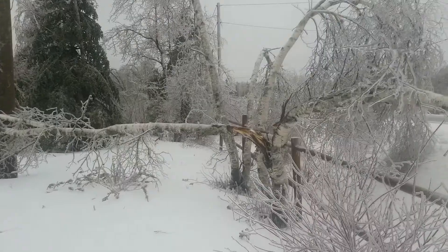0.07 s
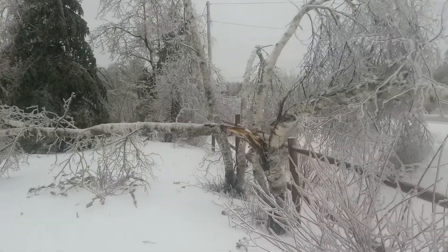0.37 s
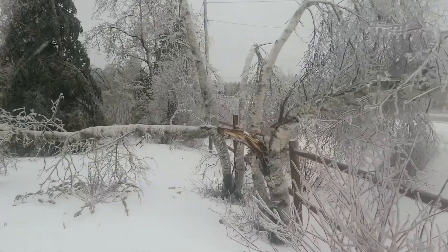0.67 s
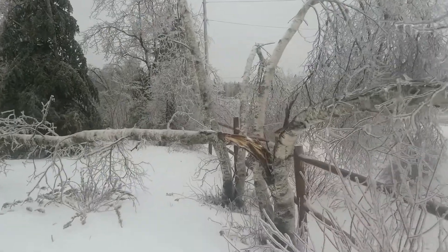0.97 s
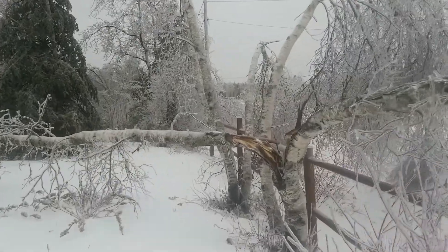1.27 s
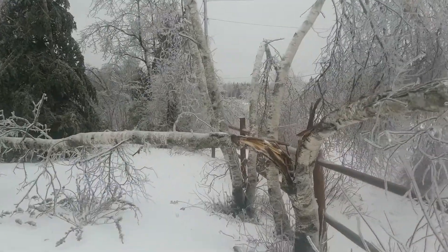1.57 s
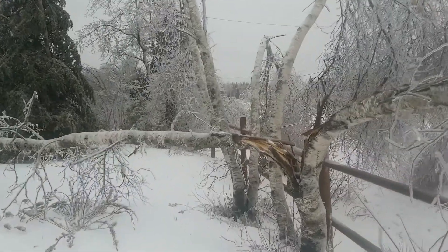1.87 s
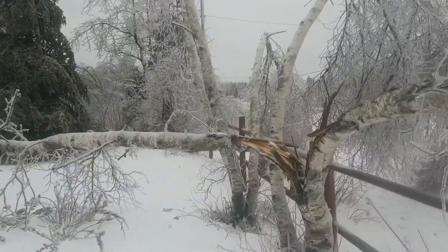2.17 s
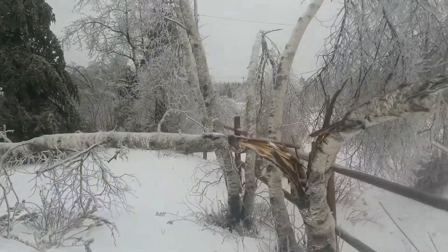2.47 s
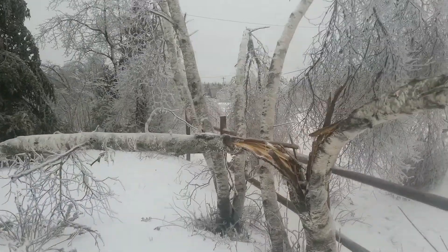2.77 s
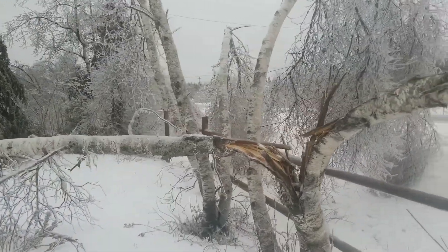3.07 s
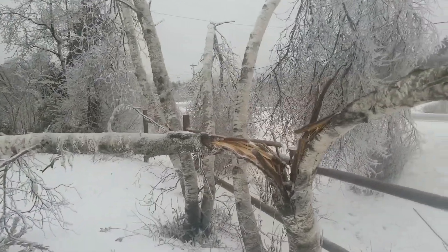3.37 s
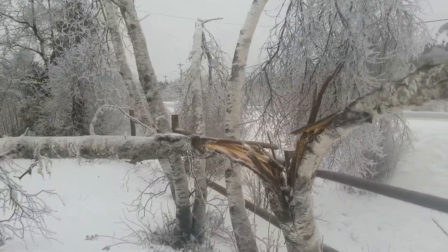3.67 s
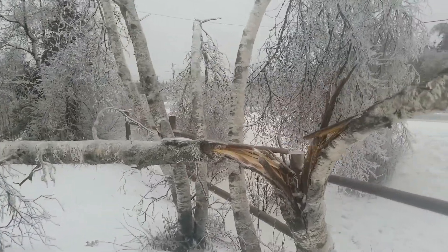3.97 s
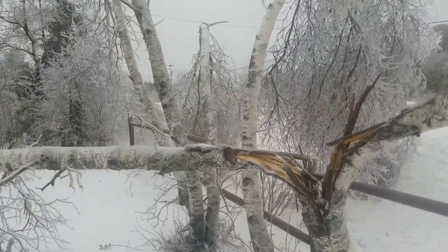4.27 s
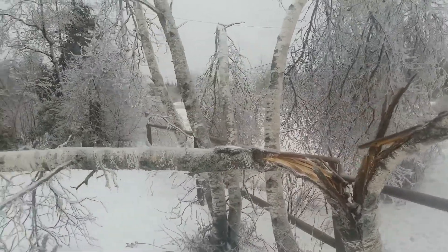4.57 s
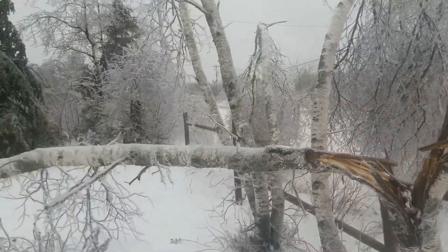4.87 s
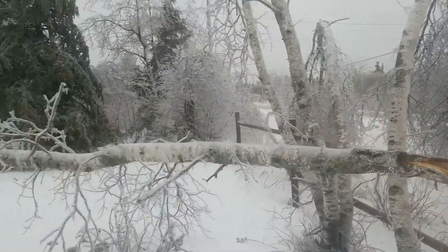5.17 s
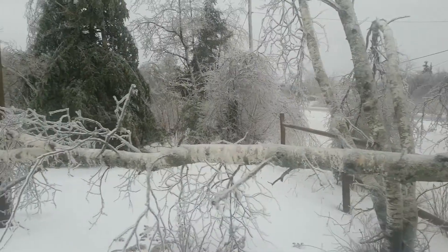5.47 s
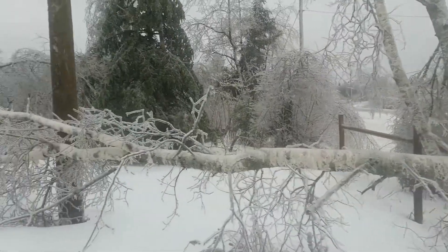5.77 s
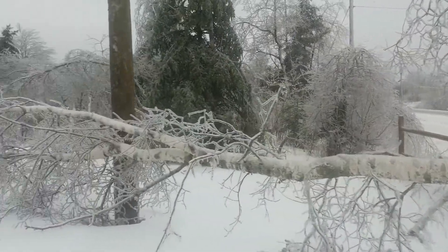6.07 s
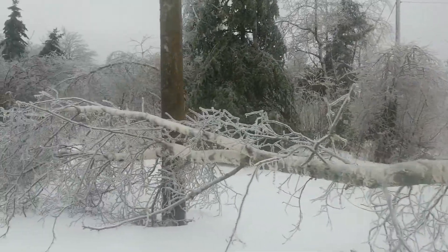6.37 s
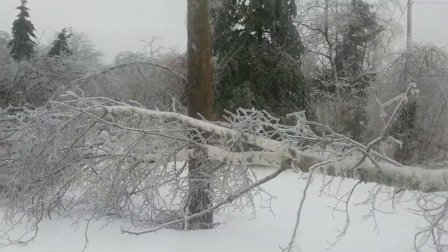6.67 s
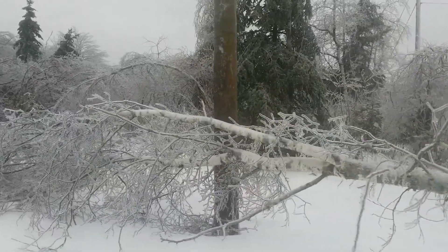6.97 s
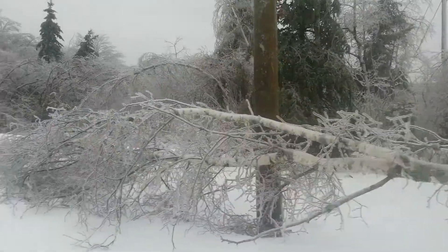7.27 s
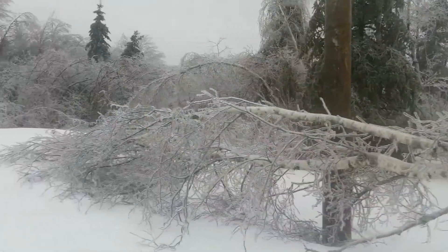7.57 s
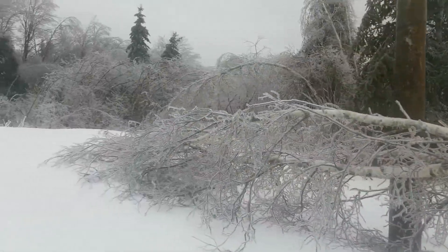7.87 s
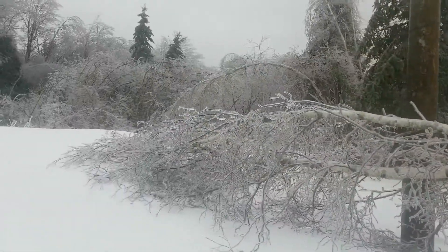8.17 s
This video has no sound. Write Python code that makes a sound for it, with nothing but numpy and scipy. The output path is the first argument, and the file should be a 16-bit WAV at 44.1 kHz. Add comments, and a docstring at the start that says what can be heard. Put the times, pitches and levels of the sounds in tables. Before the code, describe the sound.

Boots break slowly through an icy snow crust in a yard, over gusty wind rumble, tiny twig clicks and soft hiss.

```python
"""Slow footsteps crunch through ice-crusted snow in a yard, heard from a hand-held phone.
Each boot knocks on the crust, breaks it in a shower of tiny fractures and packs the snow below.
Iced twigs tick, wind buffets the two microphone ports, and a faint far hum lies under a soft hiss."""
import sys
import numpy as np
from scipy import signal
from scipy.fft import rfft, irfft
from scipy.io import wavfile

SR = 44100
rng = np.random.default_rng(int(sys.argv[2]) if len(sys.argv) > 2 else 0)


def log_audio(samples):
    """Write samples as a 16-bit WAV file to the path given in sys.argv[1]."""
    # one column per channel
    frames = np.atleast_2d(samples).T
    # limit to full scale, then quantise
    limited = np.clip(frames, -1, 1)
    pcm = np.round(limited * 32767).astype(np.int16)
    wavfile.write(sys.argv[1], SR, pcm)


N = 362502
TIME_S = np.arange(N) / SR
STEP_TIME_S = np.arange(-.15, 1.5, .001)  # relative to peak load
LEFT_RIGHT = np.array([[1], [-1]])
FEET_PAN_DB, CRACK_PAN_DB = 0.9, 1.5  # left minus right
TOP_HZ = 16100


def undb(db):
    return 10 ** (np.asarray(db) / 20)


def unit_rms(x):
    return x / np.sqrt(np.mean(x ** 2))


def add(track, time_s, sound):
    """Mix a sound into a track."""
    start = max(int(time_s * SR), 0)
    track[..., start:start + sound.shape[-1]] += sound[..., :max(N - start, 0)]


def response(spectrum, size=4096):
    """Minimum-phase impulse response from (frequency [Hz], gain [dB]) points."""
    hz, db = np.transpose(spectrum)
    bins_hz = np.maximum(np.arange(size // 2 + 1) * SR / size, 1)
    gain = undb(np.interp(np.log(bins_hz), np.log(hz), db))
    cepstrum = irfft(np.log(gain))
    cepstrum[1:size // 2] *= 2
    cepstrum[size // 2 + 1:] = 0
    return irfft(np.exp(rfft(cepstrum)))


def equalise(x, spectrum):
    """Filter with the gains of a spectrum."""
    return signal.oaconvolve(x, response(spectrum))[:N]


def colour(x, spectrum):
    """Give a white signal a spectrum at unchanged power."""
    return equalise(x, spectrum) / np.linalg.norm(response(spectrum))


def band(x, hz, ratio, order=2):
    """Band-pass from hz / ratio to hz * ratio."""
    edges_hz = [hz / ratio, min(hz * ratio, .45 * SR)]
    return signal.sosfilt(signal.butter(order, edges_hz, "band", fs=SR, output="sos"), x)


def drift(per_s):
    """Random line segments, spread near 1."""
    knots = rng.standard_normal(N * per_s // SR + 2)
    return np.interp(TIME_S * per_s, np.arange(len(knots)), knots)


def grains(per_s, spread_db):
    """Single fractures: impulses at random times, power near 1."""
    chance = np.clip(per_s / SR, 1e-5, 1)
    size = unit_rms(undb(spread_db * np.minimum(rng.exponential(size=N), 4)))
    fires = rng.random(N) < chance
    return fires * rng.choice([-1, 1], N) * size / np.sqrt(chance)


def burst(rise_s, t60_s, size=8192):
    """Fracture envelope: fast rise, exponential decay, peak 1."""
    t = np.arange(size) / SR
    envelope = (1 - np.exp(-t / rise_s)) * np.exp(-np.log(1000) * t / t60_s)
    return envelope / envelope.max()


# outdoor hiss: (frequency [Hz], gain [dB])
HISS_SPECTRUM = [(90, 12), (150, -16), (250, 0.5), (400, 0), (520, -3.5), (900, -13.5), (1400, -15),
                 (2400, -12.5), (3800, -5), (7000, -9.5), (12400, -4), (16000, -5.5)]
# hiss width: (frequency [Hz], side minus mid [dB])
HISS_SIDE = [(100, -24), (400, 1.5), (1400, 3), (5000, 1), (8000, -11), (15000, -33)]


def hiss(level_db=-57.5, swing_db=2):
    """Soft, wide noise with a slight flicker in level."""
    mid, side = (colour(rng.standard_normal(N), HISS_SPECTRUM) for _ in range(2))
    stereo = mid + LEFT_RIGHT * equalise(side, HISS_SIDE)
    return stereo * undb(level_db + swing_db * drift(per_s=9))


def far_hum(hz=435, width_hz=29, level_db=-70):
    """Distant wavering hum: a narrow band of noise."""
    return undb(level_db) * unit_rms(band(rng.standard_normal(N), hz, ratio=1 + width_hz / hz / 2))


# wind on the ports: (time [s], level [dB], unused)
WIND_LEVELS = [(0, -51, -3), (0.35, -47.5, -1), (0.88, -48, -32), (1.15, -39, -1), (1.8, -37, 0),
               (2.1, -34, 9), (2.55, -35, 4), (2.95, -48.5, 18), (3.25, -44.5, -10), (3.7, -45.5, 11),
               (4.25, -59.5, -32), (4.95, -56, -28), (5.25, -63, -3), (5.7, -69.5, -3), (6.55, -57.5, 2),
               (7.25, -74.5, 1), (7.75, -63, 10), (8.0, -43.5, 17), (8.22, -38, 6)]
# eddy rumble: (frequency [Hz], gain [dB])
EDDY_SPECTRUM = [(15, -35), (35, 6.5), (70, 7.5), (120, 4.5), (180, -8.5), (300, -18.5), (600, -66),
                 (1500, -41.5)]


def wind(gust_db=4.5):
    """Eddies rumble on one port; strong wind adds a higher flutter."""
    level_db = np.interp(TIME_S, *np.transpose(WIND_LEVELS)[:2]) + gust_db * drift(per_s=6)
    eddies = colour(rng.standard_normal(N), EDDY_SPECTRUM) * undb(4.3 * drift(per_s=25))
    flutter = unit_rms(band(rng.standard_normal(N), hz=245, ratio=1.85)) * undb(2.4 * drift(per_s=30))
    return eddies * undb(level_db) + flutter * undb(2.04 * level_db - 10.5)


# wind thumps: (time [s], level [dB], pitch [Hz], left minus right [dB])
WIND_BUFFETS = [(0.176, -28, 149, -2), (0.683, -32.5, 117, -19), (1.023, -28.5, 167, -16),
                (1.681, -29.5, 93.5, -15), (1.966, -21, 120, -8), (2.03, -23, 100, 11),
                (2.255, -19, 115, -5), (2.295, -20.5, 178, -2), (2.379, -18.5, 122, -9.5),
                (2.451, -22, 104, 27), (2.516, -30, 126, 21), (2.745, -25.5, 95.4, -11),
                (4.342, -53, 80, -31), (4.925, -42, 84.5, -18)]


def buffets():
    """A big eddy thumps the ports and breaks up into smaller, quicker ones."""
    track = np.zeros((2, N))
    t = np.arange(-2048, 2048) / SR
    for time_s, db, hz, pan_db in WIND_BUFFETS:
        swing = np.cos(2 * np.pi * hz * t + rng.uniform(0, 2 * np.pi, (2, 1)))
        breakup = unit_rms(band(rng.standard_normal(swing.shape), 1.315 * hz, ratio=1.71, order=3))
        thump = np.exp(-(t * hz / 1.08) ** 2) * (swing + undb(-10) * breakup)
        add(track, time_s + t[0], undb(db - 0.5 + LEFT_RIGHT * pan_db / 2) * thump)
    return track


# grain width: (frequency [Hz], side minus mid [dB])
GRAIN_SIDE = [(100, -46), (400, -17), (1300, -8), (2500, -4.5), (4400, -1), (6000, 1), (8000, -7.5),
              (15000, -9.5)]


def ports(clicks, spectrum):
    """Each grain comes from its own spot and reaches the two ports differently."""
    mid = colour(clicks, spectrum)
    side = colour(clicks * rng.choice([-1, 1], N), spectrum)
    return mid + LEFT_RIGHT * equalise(side, GRAIN_SIDE)


# ice bits on twigs and crust: (time [s], level [dB], pitch [Hz])
ICE_TICKS = [(0.2382, -30.5, 3530), (0.3203, -36.5, 3330), (0.3708, -36, 11000), (0.858, -32, 3800),
             (0.9346, -39.5, 4640), (1.1046, -37, 11200), (1.4163, -32.5, 2470), (2.195, -39, 11500),
             (2.243, -36.5, 10000), (3.3897, -37, 5230), (4.455, -37, 3750), (5.561, -35, 4070),
             (5.634, -40, 4870), (6.607, -32, 2050), (6.704, -35, 3970), (7.1786, -41, 11500),
             (7.3165, -42.5, 11900), (7.792, -38, 9500)]
# iced twigs: (frequency [Hz], gain [dB])
TWIG_SPECTRUM = [(500, -38), (2000, -1.5), (3800, 3), (7000, 1.5), (11000, 5), (16000, 2.5)]


def ticks():
    """Bits of ice click, each at its own pitch, among many fainter ones in the trees."""
    clicks = np.zeros(N)
    for time_s, db, hz in ICE_TICKS:
        chip = burst(rise_s=.0001, t60_s=0.01)
        chip *= rng.standard_normal(len(chip))
        add(clicks, time_s, undb(db) * (0.77 * chip + band(chip, hz, ratio=1.34)))
    faint_hits = undb(-64) * grains(per_s=40, spread_db=3.5)
    ring = burst(rise_s=.0001, t60_s=0.031)
    ring *= rng.standard_normal(len(ring))
    patter = signal.oaconvolve(faint_hits, ring / np.linalg.norm(ring))[:N]
    return ports(clicks + patter, TWIG_SPECTRUM)


def plates(clicks, patchy_db, pieces=9, bands=36):
    """Each piece of crust rings with its own colour; the breaking moves from piece to piece."""
    activity = np.array([np.exp(3.03 * drift(per_s=28)) for _ in range(pieces)])
    shares = activity / np.linalg.norm(activity, axis=0)
    hz = np.linspace(300 ** .5, TOP_HZ ** .5, bands) ** 2
    tints_db = patchy_db * rng.standard_normal((pieces, bands))
    tints_db -= 10 * np.log10(np.mean(undb(tints_db) ** 2, axis=0))  # flat on average
    return sum(colour(clicks * share * rng.choice([-1, 1], N), np.c_[hz, db])
               for share, db in zip(shares, tints_db))


# boot impacts: (time [s], thud level [dB], thud pitch [Hz], snap level [dB])
BOOT_KNOCKS = [(1.0637, -8, 246, -24), (1.2125, -21, 350, -23.5), (1.8864, -19, 454, -29.5),
               (2.4274, -16.5, 290, -20.5), (2.7092, -15, 393, -26.5), (2.8706, -21.5, 206, -33),
               (3.7557, -15.5, 268, -36), (3.7614, -20.5, 307, -26), (3.9962, -18.5, 320, -35),
               (4.0295, -24, 295, -40), (5.2206, -30, 422, -25.5), (5.878, -26.5, 305, -42),
               (5.961, -22, 200, -53), (6.0253, -39, 434, -22.5), (6.639, -14.5, 510, -24),
               (6.8207, -20, 540, -28.5), (6.977, -20, 337, -52), (7.008, -16.5, 354, -50),
               (7.126, -25, 475, -35.5), (7.403, -19, 328, -27), (7.4286, -17.5, 256, -31.5),
               (8.0847, -19, 346, -25), (8.191, -17, 290, -37)]
# surface ice: (frequency [Hz], gain [dB])
SNAP_SPECTRUM = [(200, 21), (1300, 12.5), (3500, 4), (6500, 5), (8500, 5.5), (12000, 9.5), (16000, 1.5)]


def knocks():
    """Heel or toe hits the crust: the slab thuds on the snow and its surface snaps."""
    thuds, snap_envelope = np.zeros(N), np.zeros(N)
    for time_s, thud_db, hz, snap_db in BOOT_KNOCKS:
        thud = band(signal.unit_impulse(4096), hz, ratio=1.47)
        add(thuds, time_s, undb(thud_db - 4.5) * thud / np.abs(thud).max())
        add(snap_envelope, time_s, undb(snap_db + 0.5) * burst(rise_s=0.0002, t60_s=0.028))
    snaps = plates(snap_envelope * grains(per_s=9300, spread_db=5.5), patchy_db=1.5)
    return thuds + ports(snaps, SNAP_SPECTRUM) * undb(LEFT_RIGHT * CRACK_PAN_DB / 2)


# plates giving way: (time [s], level [dB])
PLATE_CRACKS = [(0.036, -26), (0.048, -25.5), (0.507, -31), (1.1464, -25), (1.251, -20.5), (1.304, -25.5),
                (2.003, -34), (3.033, -30), (3.05, -31), (3.445, -37), (3.6253, -22), (3.741, -35),
                (4.04, -34.5), (5.164, -37), (5.239, -27.5), (6.0547, -26), (6.188, -37.5), (6.9144, -24.5),
                (7.5383, -27.5)]
# cracking crust: (frequency [Hz], gain [dB])
CRACK_SPECTRUM = [(100, 21), (400, 10), (1200, -5), (2500, 4.5), (3600, 3), (5000, -2), (7000, -10),
                  (8500, -4), (12000, 0.5), (16000, -4.5)]


def cracks():
    """Whole plates of crust let go in short showers of fractures."""
    envelope = np.zeros(N)
    for time_s, db in PLATE_CRACKS:
        add(envelope, time_s, undb(db + 3.0) * burst(rise_s=0.00018, t60_s=0.039))
    fractures = plates(envelope * grains(per_s=14000, spread_db=-1.0), patchy_db=5.5)
    return ports(fractures, CRACK_SPECTRUM) * undb(LEFT_RIGHT * CRACK_PAN_DB / 2)


def avalanches(per_s, t60_s, depth):
    """Fractures come in chains: activity leaps up at random and dies away."""
    triggers = np.abs(grains(per_s, spread_db=0))
    surges = signal.oaconvolve(triggers, burst(rise_s=0.0001, t60_s=t60_s))[:N]
    return unit_rms(1 + depth * unit_rms(surges))


def boot_force(rise_s, fade_db_per_s, hold_s=0):
    """Load on the crust: bell-shaped rise from -20 dB in rise_s, hold at 1, steady fade."""
    before_s, after_s = np.minimum(STEP_TIME_S, 0), np.maximum(STEP_TIME_S - hold_s, 0)
    return undb(-20 * (before_s / rise_s) ** 2 - fade_db_per_s * after_s)


# boot breaks the crust: (peak time [s], rise [s], fade [dB/s], crush [dB], spray [dB], pack [dB])
BOOT_STEPS = [(0.057, 0.019, 133, -31.5, -33, -34.5), (0.523, 0.016, 155, -48, -41, -36.5),
              (0.659, 0.058, 179, -46, -49, -45), (0.756, 0.018, 273, -44.5, -43, -47),
              (1.154, 0.024, 209, -39.5, -30, -36.5), (1.255, 0.03, 144, -36, -33.5, -36),
              (1.304, 0.055, 132, -42, -40.5, -40), (1.895, 0.025, 220, -47, -39.5, -40.5),
              (3.05, 0.016, 138, -35.5, -31, -34.5), (3.228, 0.027, 107, -56.5, -50, -34.5),
              (3.448, 0.033, 300, -54, -40.5, -64), (3.632, 0.036, 230, -31, -27.5, -33.5),
              (3.761, 0.027, 153, -46, -55, -68.5), (5.094, 0.045, 317, -48, -42.5, -47),
              (5.238, 0.032, 140, -34.5, -33, -40.5), (5.37, 0.054, 308, -66, -41, -44.5),
              (5.883, 0.026, 136, -43.5, -38.5, -43.5), (6.073, 0.037, 162, -32, -32, -36),
              (6.316, 0.06, 344, -47.5, -51, -57), (6.641, 0.076, 226, -48, -49, -48.5),
              (6.825, 0.07, 160, -51.5, -45, -47.5), (6.926, 0.011, 160, -36, -37, -35.5),
              (7.413, 0.029, 245, -47, -43, -39.5), (7.562, 0.037, 140, -33, -30.5, -34.5),
              (8.09, 0.018, 350, -48, -36.5, -41), (8.195, 0.018, 300, -45.5, -39.5, -47.5)]
# multipliers of a step's fade rate: (crush [ratio], spray [ratio], pack [ratio])
LAYER_FADES = [1.0, 1.3, 0.97]
# sole drags or presses: (start [s], length [s], crush [dB], spray [dB], pack [dB])
SOLE_SCUFFS = [(0.0, 0.025, -52, -49, -46.5), (0.13, 0.062, -51, -50.5, -44),
               (0.453, 0.047, -60.5, -56, -50), (0.544, 0.087, -59, -70, -50),
               (1.173, 0.005, -40, -50, -40), (1.4, 0.017, -53, -59, -45.5),
               (1.99, 0.14, -49.5, -46.5, -44), (2.168, 0.11, -80.5, -56, -65.5),
               (2.424, 0.085, -75, -56, -65), (2.724, 0.068, -56.5, -43, -51.5),
               (2.872, 0.17, -60, -45.5, -64), (3.152, 0.077, -47.5, -49, -40),
               (3.232, 0.214, -61.5, -59, -40.5), (3.52, 0.11, -64, -54, -60),
               (4.052, 0.011, -46.5, -48, -41), (5.264, 0.036, -39, -45, -41),
               (5.973, 0.065, -46, -50.5, -51), (6.69, 0.32, -62, -53, -51.5),
               (7.51, 0.04, -59, -44.5, -50), (7.614, 0.06, -41, -55, -42.5),
               (8.052, 0.01, -48, -49.5, -48.5)]


def footwork(settle_db=(-25, -21.5, -27), settle_db_per_s=(39, 25, 36.5)):
    """Crush, spray and pack envelopes: steps, loose pieces settling and scuffs add in power."""
    power = np.zeros((3, N))
    for time_s, rise_s, fade_db_per_s, *levels_db in BOOT_STEPS:
        for layer, db in enumerate(levels_db):
            step = undb(db) * boot_force(rise_s, fade_db_per_s * LAYER_FADES[layer])
            settle = undb(db + settle_db[layer]) * boot_force(rise_s, settle_db_per_s[layer])
            power[layer] += np.interp(TIME_S - time_s, STEP_TIME_S, step ** 2 + settle ** 2, 0, 0)
    for time_s, length_s, *levels_db in SOLE_SCUFFS:
        drag = boot_force(rise_s=0.04, fade_db_per_s=398, hold_s=length_s)
        power += undb(levels_db)[:, None] ** 2 * np.interp(TIME_S - time_s, STEP_TIME_S, drag ** 2, 0, 0)
    return np.sqrt(power)


# crushed crust, sprayed ice, packed snow, sinking boot: (frequency [Hz], gain [dB])
CRUSH_SPECTRUM = [(150, -29.5), (500, -8.5), (1200, -1.5), (1800, 2), (3400, 1.5), (5000, -7),
                  (7000, -13.5), (10000, -20)]
SPRAY_SPECTRUM = [(1000, -30.5), (3000, -2), (5000, 2), (7000, -2), (8500, 2.5), (12000, 6.5), (16000, 0.5)]
PACK_SPECTRUM = [(35, -37), (70, 3.5), (130, -14), (220, 3), (350, 2.5), (700, -1.5), (1300, -4.5),
                 (1800, -10), (2700, -25), (6000, -27.5)]
SINK_SPECTRUM = [(30, -38), (70, -9), (140, 5), (220, -3.5), (400, -6), (1200, -47)]


def crunch():
    """Crust shatters and sprays, denser under load; snow packs in dull slips as the boot sinks in."""
    crush, spray, pack = footwork()
    surge = avalanches(per_s=200, t60_s=0.013, depth=0.28)
    load = crush / undb(-33)
    grain_gain = undb(1)
    grit = grain_gain * spray * surge * grains(per_s=14000 * load ** .45, spread_db=4)
    shards = grain_gain * crush * surge * grains(per_s=4000 * load ** .63, spread_db=0)
    slips = grain_gain * pack * undb(3.9 * drift(per_s=120)) * grains(per_s=2000, spread_db=2)
    rumble = colour(np.sqrt(crush * pack) * rng.standard_normal(N), SINK_SPECTRUM)
    ice = ports(plates(grit, patchy_db=4.5), SPRAY_SPECTRUM)
    ice += ports(plates(shards, patchy_db=4.5), CRUSH_SPECTRUM)
    return ice * undb(LEFT_RIGHT * FEET_PAN_DB / 2) + ports(slips, PACK_SPECTRUM) + rumble


def scene():
    """Yard background, independent wind on each port, footsteps."""
    background = hiss() + far_hum() + np.array([wind(), wind()]) + buffets() + ticks()
    return background + knocks() + cracks() + crunch()


# port mismatch, added left and subtracted right: (frequency [Hz], gain [dB])
PORT_MISMATCH = [(300, 0.5), (1000, -0.3), (2500, -0.17), (8000, 0.25), (16000, 0.5)]


def record(dry):
    """The left port is slightly brighter; the phone cuts the top."""
    left = equalise(dry[0], PORT_MISMATCH)
    right = equalise(dry[1], [(hz, -db) for hz, db in PORT_MISMATCH])
    low_pass = signal.ellip(10, .2, 70, TOP_HZ, fs=SR, output="sos")
    return signal.sosfilt(low_pass, np.array([left, right]))


dry = scene()
out = record(dry)
log_audio(out)
```